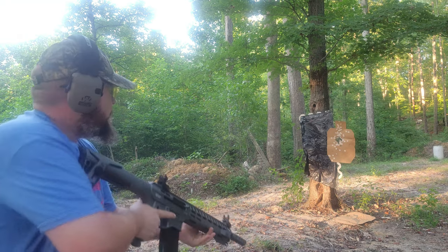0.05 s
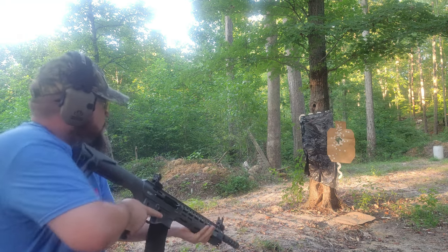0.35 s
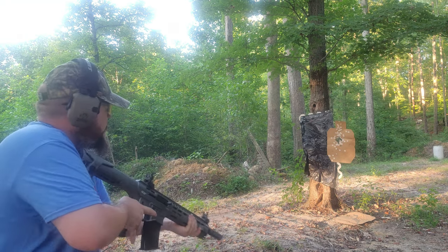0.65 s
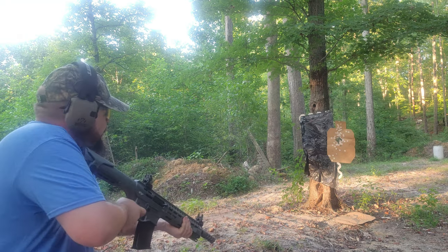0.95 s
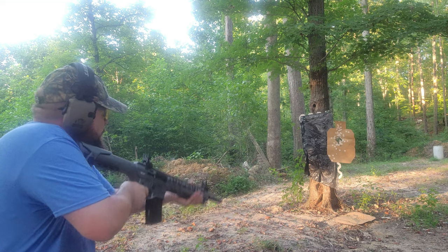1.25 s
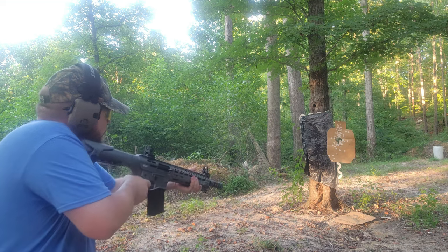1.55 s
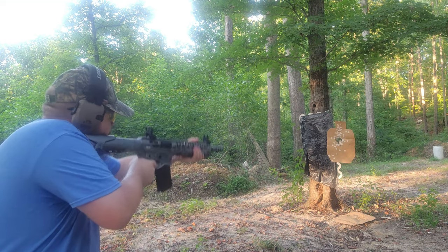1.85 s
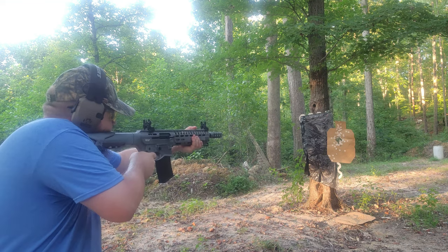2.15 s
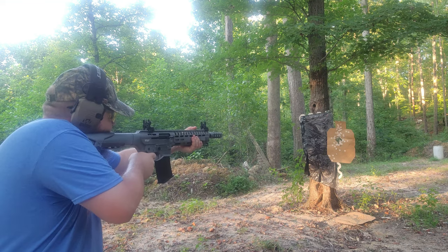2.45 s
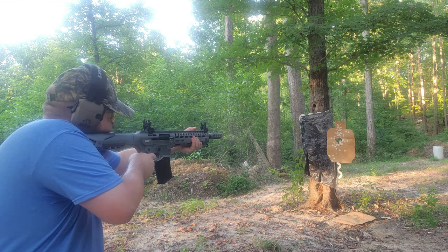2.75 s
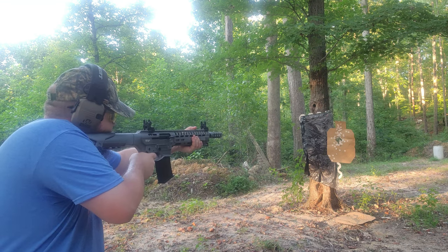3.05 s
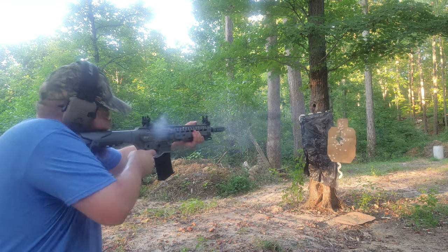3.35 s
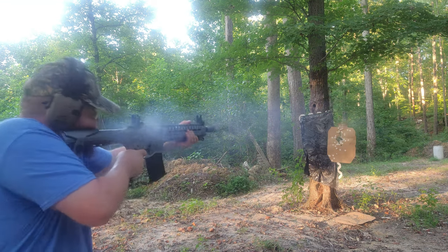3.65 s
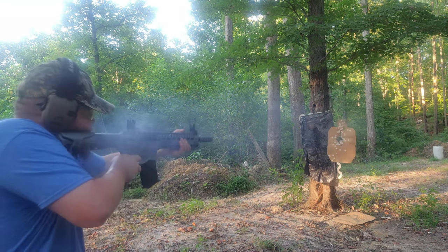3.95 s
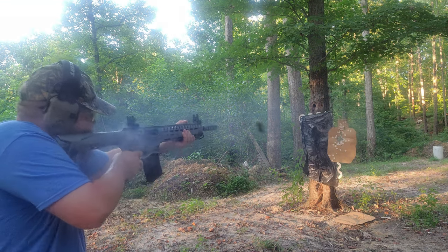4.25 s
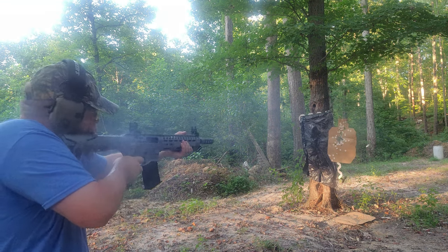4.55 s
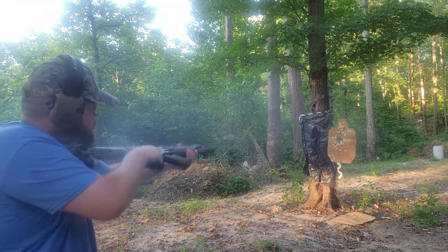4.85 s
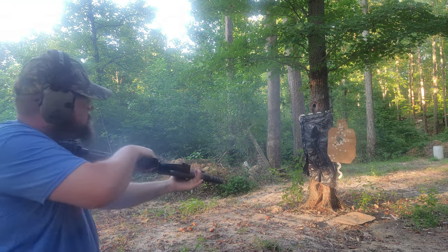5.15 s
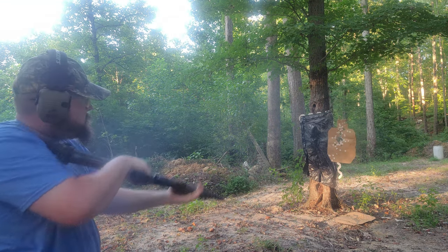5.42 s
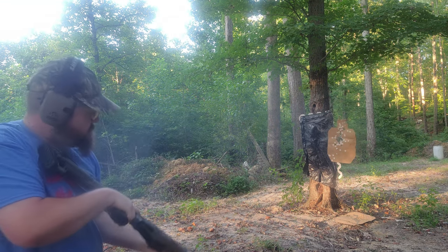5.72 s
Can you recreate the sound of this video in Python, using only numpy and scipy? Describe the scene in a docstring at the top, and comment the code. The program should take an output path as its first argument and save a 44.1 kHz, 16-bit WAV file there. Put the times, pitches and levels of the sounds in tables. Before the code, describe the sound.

After soft shuffling and clicks, five rapid shotgun blasts smack a target and echo through a forest where distant insects buzz.

```python
"""Five shotgun blasts in a forest clearing

A step from the microphone, the shooter shifts his stance, clicks the safety off and fires five quick
shots from a semi-automatic. Each burst of muzzle gas is followed by a smack from the target, slaps from
the nearest trunks and a long roll through the woods. Far off to the left insects buzz, pushed down by
the gain control when the gun fires."""
import sys
import numpy as np
from scipy import signal
from scipy.fft import rfft, irfft, next_fast_len
from scipy.io import wavfile
from scipy.ndimage import uniform_filter1d

SR = 44100
rng = np.random.default_rng(int(sys.argv[2]) if len(sys.argv) > 2 else 0)


def unload_audio(sound):
    """Save the sound as a 16-bit wav file, at the path given as the first command line argument."""
    columns = np.transpose(np.atleast_2d(sound))
    # keep every value between -1 and 1, then stretch to whole-number steps
    steps = np.round(np.clip(columns, -1, 1) * 32767)
    wavfile.write(sys.argv[1], SR, steps.astype(np.int16))


N = 263894
TIME = np.arange(N) / SR

# The shots. Each row: start in seconds, level of blast and echoes in dB, swell in seconds, then trims
# in dB for crack, bass and target smack, and the smack's pitch ratio.
SHOTS = [(3.2217, -4.5, .038, -7, -6.5, -5, 0.92), (3.41, 0.4, 0.02, 3, 3.5, 5.5, 1),
         (3.5768, 1.5, 0.015, 7, -.5, 5, 1), (3.7332, 0.26, 0.027, 7, -2, 5, 0.96),
         (4.092, 0, 0.025, 8, 0, 1, 0.58)]
# A shot's bands. Each row: centre in Hz, blast in dB, its t60 in seconds, roll in dB, its t60 in seconds.
SHOT_BANDS = [(50, -9.5, 0.23, -21.5, 2.8), (92.5, -10, 0.33, -12, 3.7), (202, -7, 0.38, -3.5, 3.6),
              (305, -22, 0.13, -11, 6.5), (505, -12, 0.54, -4.5, 5.22), (740, -11, 0.22, -9, 4.76),
              (1210, -4, 0.21, -11.5, 4.6), (2000, -5, 0.15, -12, 3.34), (3200, -8.5, 0.31, -9, 2.51),
              (6040, -6, 0.32, -7.5, 1.95), (9260, -15.5, 0.22, -17, 1.1), (13800, -4, 0.35, -10.5, 1.2)]
# Ringing modes of the gun's action, the target and the spent shell.
# Each row: frequency in Hz, relative level in dB, t60 in seconds.
ACTION_MODES = [(2130, -3.5, 0.66), (2310, -8.5, 0.19), (3340, 3, 0.4), (3180, -3, 0.48), (5720, -0.5, .45),
                (6110, -9.5, 0.46)]
TARGET_MODES = [(1219, 0, 0.027), (950, -18, 0.0054), (302, -5, 0.016), (2720, -19, 0.019)]
SHELL_MODES = [(2840, 5, 0.028), (3770, -12, 0.026), (6030, -3, 0.034), (5920, 5.5, 0.041)]
# Clear echoes off big trunks and banks. Each row: delay in seconds, relative level in dB, pitch in Hz.
ECHOES = [(.0612, 5, 600), (.0658, 6, 260), (.0763, 4, 310), (.0867, 4.5, 250), (.153, 1, 197),
          (.159, -1.5, 328.4), (.182, 0.5, 400), (.263, -7, 380), (.383, -6, 262), (.464, -6.5, 480),
          (.579, -12, 382)]
# Broad swells off dense stands of trees. Each row: delay in seconds, half length in seconds, lift in dB.
GROVES = [(.163, 0.005, 10.5), (.465, 0.044, 6.5), (.575, 0.024, 5), (.81, .04, 3.5), (1.02, .03, 2.5)]
# Boots on dry ground. Each row: middle in seconds, half length in seconds, level in dB, pitch in Hz.
SCUFFS = [(0.054, 0.0093, -57, 1440), (.235, 0.24, -65.5, 1400), (0.287, 0.055, -45.5, 1440),
          (0.512, 0.036, -64.5, 1050), (0.62, 0.012, -49.5, 1060), (0.693, 0.072, -61, 1120),
          (0.867, 0.002, -49, 1350)]
# A scuff's spectrum. Each row: multiple of its pitch, relative level in dB.
SCUFF_COLOUR = [(.2, -24), (.5, -11), (.8, 2.5), (1, 0), (1.3, -3.5), (1.8, -14), (4, -43), (8, -39)]
# Sleeves, one rustle for each move of the arms. Each row: start in seconds, length in seconds, level in dB.
RUSTLES = [(0.064, 0.1, -64), (0.202, 0.03, -50), (0.23, .06, -58), (0.647, 0.083, -58), (.945, .015, -71),
           (5.015, .24, -59.5), (5.741, 0.19, -60.5)]
# Safety, sling and fittings. Each row: start in seconds, relative peak in dB, t60 in seconds, treble in dB.
CLICKS = [(.2895, -36, .012, -9), (0.33, -41, .01, -1), (0.7434, -23, 0.0093, 0), (0.7526, -33, 0.0099, 5),
          (.825, -44, .012, 18), (0.9018, -41, 0.0092, 6), (4.74, -34, .02, 15), (4.795, -28, 0.015, 14),
          (5.493, -45, 0.016, 0), (5.784, -37, .02, 17)]
# Spectra of the blast's hard front, clicks, cloth, insects and air.
# Each row: frequency in Hz, relative level in dB.
CRACK_COLOUR = [(300, -15.5), (800, 2.5), (1200, 4), (1700, -7.5), (2600, -27), (6000, -13), (14000, -22)]
CLICK_COLOUR = [(200, -27), (700, -12), (1550, 1.5), (2400, -17), (5000, -10), (9500, -17), (13000, -18),
                (16000, -27)]
CLOTH_COLOUR = [(1500, -22), (3000, -7), (6000, -6), (9500, -17), (13000, -5.5), (16000, -6.5)]
INSECT_COLOUR = [(1940, -63.5), (3300, -25.5), (3600, -23.5), (4220, -13), (5250, -18.5), (5680, -11),
                 (6350, -8.5), (6710, -1), (7030, 3.5), (7890, -10.5), (8990, -34.5), (9370, -43),
                 (10000, -50.5), (13000, -90), (22000, -120)]
AIR_COLOUR = [(15, -40.5), (25, -19), (69, -1), (123, -6.5), (145, -15), (227, -14.5), (262, -19.5),
              (290, -20), (657, -22), (713, -23), (3300, -33), (4290, -70.5), (7260, -120)]
# Stereo width of the shots and of the quiet clearing. Each row: frequency in Hz, side minus mid in dB.
SHOT_WIDTH = [(60, -11), (125, -17.5), (250, -9.5), (500, -5), (1200, 0), (2200, -0.5), (14000, 0.5)]
CLEARING_WIDTH = [(60, -17.5), (110, -14.5), (200, -11), (380, -3.5), (700, 0.5), (1290, 1.5), (2380, 0.5),
                  (4400, 4.5), (8120, 1.5), (15000, 0)]


def shotgun(fresh_db=-3, action_delay_s=0.055, action_db=-24, target_delay_s=0.0302, target_db=7.5):
    """Each blast is partly the gun's own signature and partly new; the same trees answer every one."""
    out = np.zeros((2, N))
    aftermath = forest_roll()
    add(aftermath, 0, trunk_slaps())
    add(aftermath, action_delay_s, undb(action_db) * ring(ACTION_MODES, TIME[:SR // 2]))  # bolt cycles
    signature = rng.standard_normal((2, SR // 2))
    lead_s = signature.shape[-1] / SR / 2
    for start_s, db, swell_s, crack_db, bass_db, smack_db, pitch in SHOTS:
        turbulence = signature + undb(fresh_db) * rng.standard_normal(signature.shape)
        add(out, start_s - lead_s, undb(db) * muzzle_blast(swell_s, bass_db, turbulence))
        add(out, start_s, undb(crack_db) * crack(turbulence))
        add(out, start_s + target_delay_s, undb(target_db + smack_db) * target_smack(pitch))
        add(out, start_s, undb(db) * aftermath)
    return out


def muzzle_blast(swell_s, bass_db, turbulence, hold_s=0.007, front_db=-5.5):
    """Muzzle gas a step away swells quickly, holds and dies; it peaks in the middle of the array."""
    size = turbulence.shape[-1]
    t = (np.arange(size) - size // 2) / SR
    gas = split(spread(turbulence, SHOT_WIDTH))
    front = np.where(t < 0, undb(front_db) * np.clip(1 + t / swell_s, 0, 1) ** 2, 1)
    dying_s = np.maximum(t - hold_s, 0)
    return front * sum(band * undb(db + bass_db * (hz < 130)) * fade(dying_s, t60)
                       for band, (hz, db, t60, _, _) in zip(gas, SHOT_BANDS))


def crack(turbulence, trim_db=-1, length_s=0.016, drive=1.2, late_s=0.001):
    """The shock front overloads the microphone: a short, flat-topped burst with an instant start."""
    t = TIME[:SR // 30]
    burst = colour(spread(turbulence[:, :len(t)], SHOT_WIDTH), CRACK_COLOUR)
    envelope = (t > late_s) * np.exp(-(t / length_s) ** 3)
    return undb(trim_db) * unit(np.tanh(drive * burst)) * envelope


def target_smack(pitch, push_s=0.002, rise_s=0.0007, rough=0.55):
    """Downrange, the charge lands over a few milliseconds and drives a short ring, never twice alike."""
    t = TIME[:SR // 10]
    detune = pitch * (1 + 0.025 * rng.standard_normal(len(TARGET_MODES)))
    note = sum(undb(db) * np.sin(2 * np.pi * hz * ratio * t) * fade(np.maximum(t - push_s, 0), t60)
               for (hz, db, t60), ratio in zip(TARGET_MODES, detune))
    splinters = colour(rng.standard_normal((2, len(t))), CRACK_COLOUR)
    return np.minimum(t / rise_s, 1) * (note + rough * splinters * fade(t, t60=0.042))


def trunk_slaps(edge=0.7, snap_db=-7, snap_loss_db_per_s=22, side_lead_s=0.00014):
    """Near trunks return the blast as a push and a pull with a little crack, which distance wears off."""
    out = np.zeros((2, SR))
    t = np.arange(-SR // 100, SR // 100) / SR
    snap_colour = [(300, -15.5), (700, -1.5), (1400, -12), (3500, -18), (7000, -34.5), (10000, -47.5)]
    for k, (delay, db, hz) in enumerate(ECHOES):
        phase = 2 * np.pi * hz * t
        steep_front = edge * np.tanh(4 * phase) * np.exp(-np.abs(phase))
        wave = -(np.sin(phase) + steep_front) * np.exp(-(phase / 2.73) ** 2)
        grain = colour(rng.standard_normal(len(t)), snap_colour)
        snap = undb(snap_db - snap_loss_db_per_s * delay) * grain * np.exp(-(t / 0.0035) ** 2)
        lead_s = side_lead_s * (-1) ** (k + 1)  # trunks stand on either side: one channel hears it first
        for channel, sign in zip(out, (-1, 1)):
            add(channel, delay + t[0] + sign * lead_s / 2, undb(db) * (wave + snap))
    return out


def forest_roll(build_s=0.074, near_s=0.092, trunks_per_s=900, trunk_db=-1, leaf_db=-4.5, bark_hz=750):
    """Deeper in, trunks scatter separate low echoes and leaves a hiss; distance thins and dulls both."""
    t = TIME[:3 * SR]
    leaves = rng.standard_normal((2, len(t)))
    trunks = unit(rng.standard_normal((2, len(t))) * (rng.random((2, len(t))) < trunks_per_s / SR))
    trunks = signal.sosfilt(signal.butter(2, bark_hz, fs=SR, output="sos"), trunks)
    scatter = split(spread(undb(leaf_db) * leaves + undb(trunk_db) * trunks, SHOT_WIDTH))
    reach = (1 - np.exp(-t / build_s)) / (1 + t / near_s)
    grove_db = sum(db * np.exp(-((t - delay) / half_s) ** 2) for delay, half_s, db in GROVES)
    out = 0
    for band, (hz, _, _, db, t60) in zip(scatter, SHOT_BANDS):
        flicker_db = 1.9 * wander(rate_hz=55)[:len(t)]
        swell_db = grove_db * (250 < hz < 1500)  # the range that groves reflect best
        out = out + band * undb(db + flicker_db + swell_db) * fade(t, t60)
    return reach * out


def handling(click_trim_db=-1, grit_db=3.5, shell_s=4.9768, shell_db=-40):
    """Close to the microphone: cloth and gritty scuffs, clicks from the gun, a spent shell landing."""
    grains = np.minimum(rng.exponential(size=N), 5)
    grit = spread(rng.standard_normal((2, N)) * undb(grit_db * grains), CLEARING_WIDTH)
    sleeve_power = sum((undb(db) * rustle(start_s, length_s)) ** 2 for start_s, length_s, db in RUSTLES)
    out = np.sqrt(sleeve_power) * colour(grit, CLOTH_COLOUR)
    for middle_s, half_s, db, hz in SCUFFS:
        scrape = colour(grit[:, :SR], [(hz * ratio, level) for ratio, level in SCUFF_COLOUR])
        add(out, 0, undb(db) * scrape * np.exp(-((TIME[:SR] - middle_s) / half_s) ** 2))
    t = TIME[:SR // 20]
    for start_s, db, t60, treble_db in CLICKS:
        tone = [(hz, level + treble_db * (hz > 4000)) for hz, level in CLICK_COLOUR]
        click = colour(rng.standard_normal((2, len(t))), tone) * fade(t, t60)
        add(out, start_s, undb(db + click_trim_db) * click / np.abs(click).max())
    add(out, shell_s, undb(shell_db) * ring(SHELL_MODES, t))
    return out


def rustle(start_s, length_s):
    """Level of one rub of cloth: it swells, holds while the arm moves, and dies as the cloth settles."""
    t = TIME - start_s
    rise_s = 0.013 + 0.24 * length_s  # a longer move starts more gently
    return np.exp(-(np.minimum(t, 0) / rise_s) ** 2) * fade(np.maximum(t - length_s, 0), t60=0.48)


def woods(insect_db=-51.5, insect_left_db=4, air_db=-60, hiss_db=-81.5):
    """Far to the left, insects too many to tell apart, over a low murmur of air and a faint hiss."""
    chorus = colour(rng.standard_normal((2, N)), INSECT_COLOUR) * pan(insect_left_db)
    air = colour(spread(rng.standard_normal((2, N)), CLEARING_WIDTH), AIR_COLOUR)
    chorus *= undb(insect_db - 1.14 * wander(rate_hz=1.8) + 0.7 * wander(rate_hz=70))  # swell, flutter
    hiss_colour = [(2000, -7.5), (9500, -7.5), (12500, 0), (16000, -1.5), (18000, -26.5)]
    hiss = colour(rng.standard_normal((2, N)), hiss_colour)
    air *= undb(air_db + 0.77 * wander(rate_hz=3.9))
    return chorus + air + undb(hiss_db) * hiss


def undb(db):
    """Decibels to gain."""
    return 10 ** (np.asarray(db) / 20)


def unit(x):
    """Scale to rms 1."""
    return x / np.sqrt(np.mean(x ** 2))


def pan(left_db):
    """Channel gains that put the left this far above the right."""
    return undb(np.array([[left_db], [-left_db]]) / 2)


def fade(t, t60):
    """Exponential decay that loses 60 dB in t60."""
    return np.exp(-np.log(1000) * t / t60)


def along(points, size):
    """(Hz, value) points joined on a log axis, read at the bins of a signal of this size."""
    hz, value = np.transpose(points)
    return np.interp(np.log(np.fft.rfftfreq(size, 1 / SR) + 1), np.log(hz), value)


def colour(x, points):
    """Filter by a (Hz, dB) spectrum; rms 1."""
    size = next_fast_len(x.shape[-1], True)
    return unit(irfft(rfft(x, size) * undb(along(points, size)), size)[..., :x.shape[-1]])


def spread(pair, width):
    """Two unrelated signals become left and right, alike in the bass and apart in the treble."""
    size = pair.shape[-1]
    mid, side = rfft(pair)
    share = undb(along(width, size))
    return irfft(np.array([mid + share * side, mid - share * side]) / np.sqrt(1 + share ** 2), size)


def split(x):
    """The overlapping bands of a shot, each at rms 1."""
    size = x.shape[-1]
    centres = [row[0] for row in SHOT_BANDS]
    above_rumble = 1 - np.exp(-(np.fft.rfftfreq(size, 1 / SR) / 30) ** 2)
    spectrum = rfft(x) * above_rumble
    triangles = [along(list(zip(centres, pick)), size) for pick in np.eye(len(centres))]
    return [unit(irfft(spectrum * np.sin(np.pi / 2 * triangle) ** 2, size)) for triangle in triangles]


def ring(modes, t):
    """Decaying modes of a struck thing."""
    return sum(undb(db) * np.sin(2 * np.pi * hz * t) * fade(t, t60) for hz, db, t60 in modes)


def add(out, start_s, x):
    """Mix x into out from a given time on."""
    i = int(round(start_s * SR))
    out[..., i:i + x.shape[-1]] += x[..., :out.shape[-1] - i]


def wander(rate_hz):
    """A smooth random curve with a spread near 1."""
    knots = rng.standard_normal(1024)
    return np.interp(TIME * rate_hz, np.arange(len(knots)), knots)


def scene():
    """The clearing from the microphone's place: gun and shooter close, woods all round."""
    return shotgun() + handling() + woods()


def record(dry, low_hz=35, top_hz=15900, limit_db=-8, release_db_per_s=5, left_db=-1, ceiling=1.7):
    """The microphone loses both extremes; gain drops on a blast and creeps back; peaks are rounded."""
    dry = signal.sosfilt(signal.butter(3, low_hz, "high", fs=SR, output="sos"), dry)
    power = uniform_filter1d(np.mean(dry ** 2, axis=0), size=530)  # over 12 ms
    level_db = 10 * np.log10(np.abs(power) + 1e-12)
    recovery_db = release_db_per_s * TIME
    held_db = np.maximum.accumulate(level_db + recovery_db) - recovery_db
    ducked = dry * undb(np.minimum(limit_db - held_db, 0)) * pan(left_db)
    rounded = ceiling * np.tanh(ducked / ceiling)
    return signal.sosfilt(signal.ellip(10, 0.2, 80, top_hz, fs=SR, output="sos"), rounded)


dry = scene()
out = record(dry)
unload_audio(out)
```